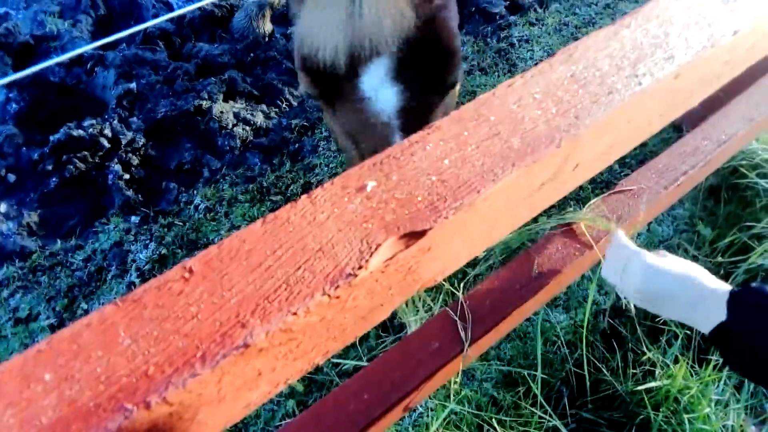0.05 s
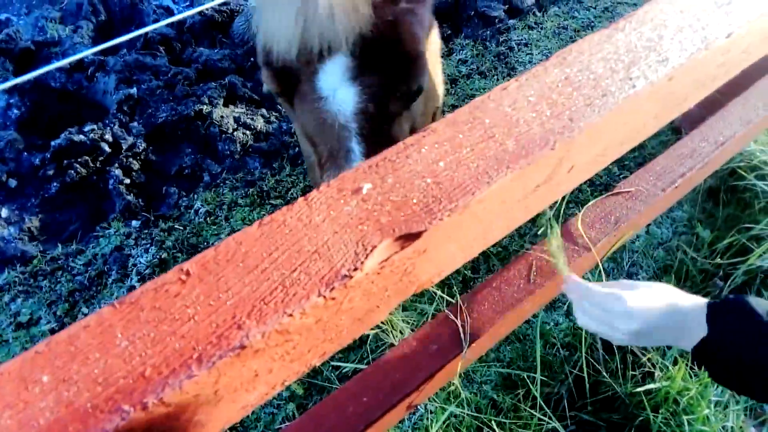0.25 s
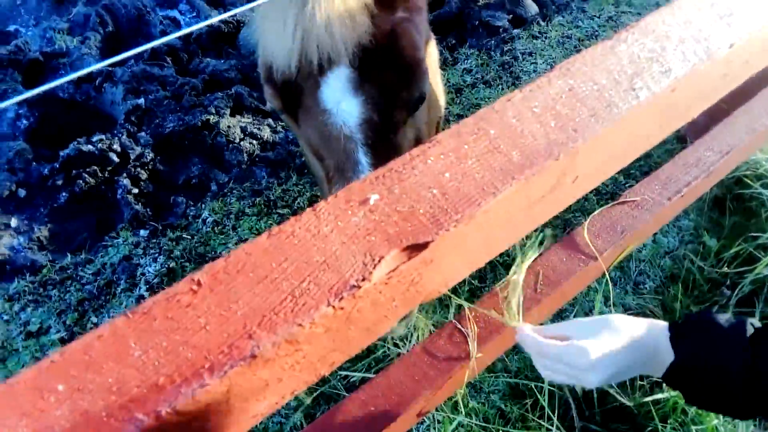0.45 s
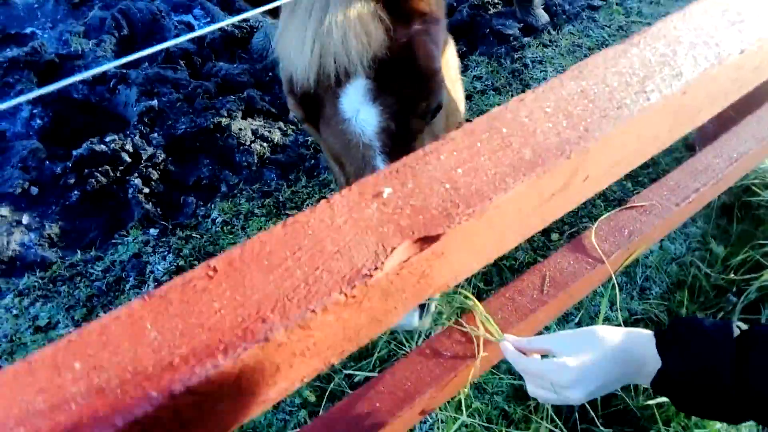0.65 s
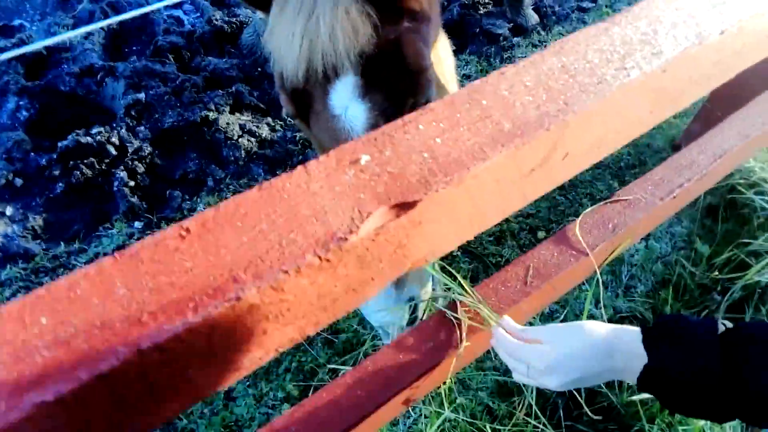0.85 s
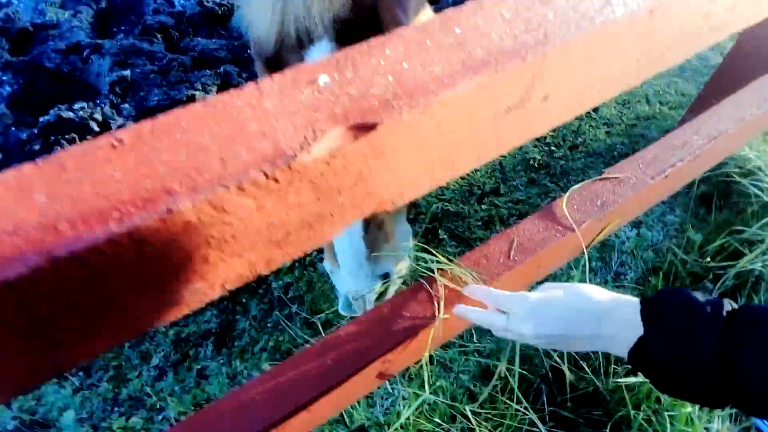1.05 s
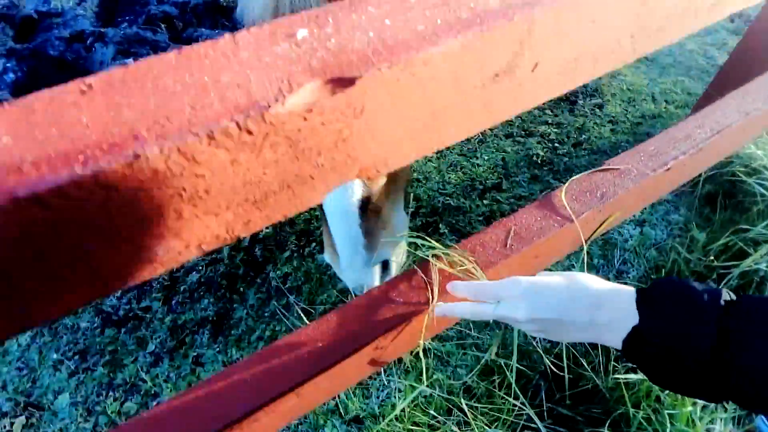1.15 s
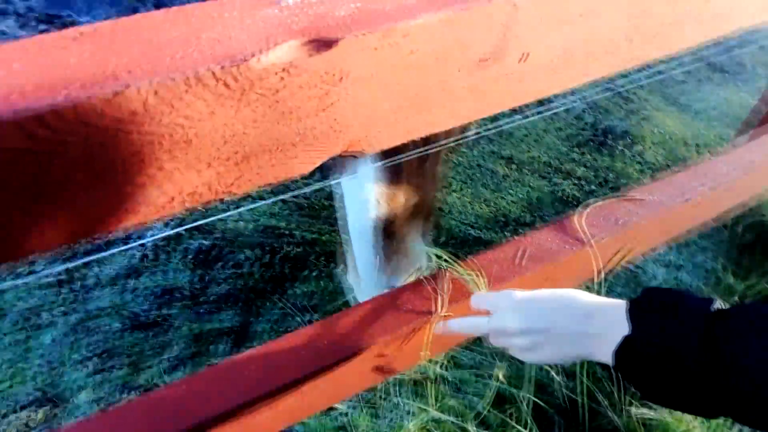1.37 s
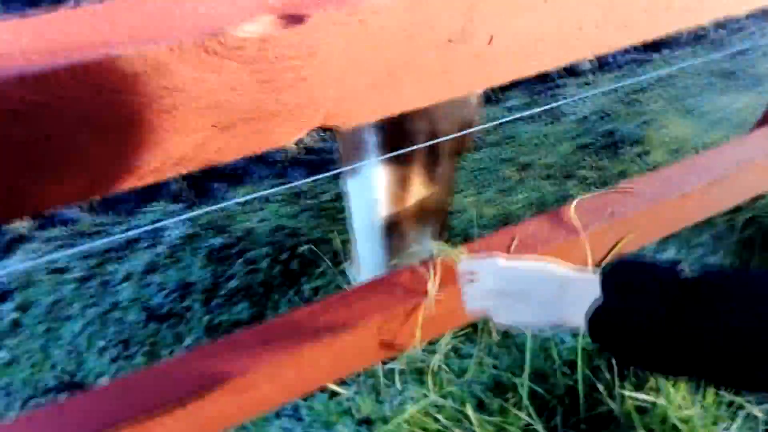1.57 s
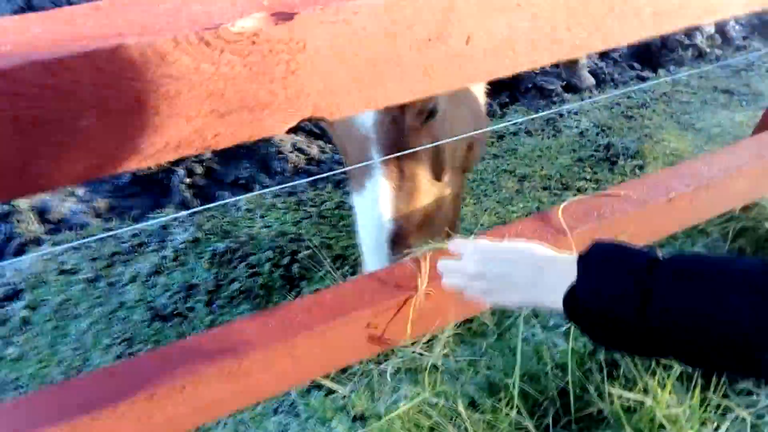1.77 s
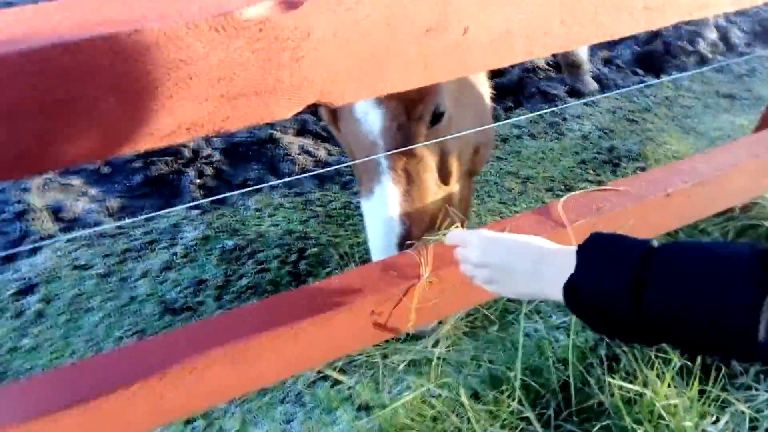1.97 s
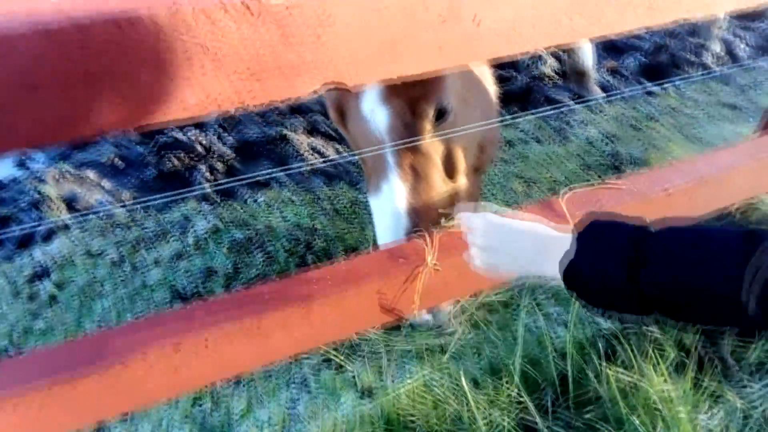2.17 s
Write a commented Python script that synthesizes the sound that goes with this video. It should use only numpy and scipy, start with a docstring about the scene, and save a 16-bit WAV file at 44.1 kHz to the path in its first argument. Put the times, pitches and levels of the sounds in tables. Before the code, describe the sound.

Close up, a horse munches grass in a quiet outdoor paddock. Low chewing thuds are joined by hissing blades, snapping stems, a dry tick and soft muzzle bumps, over a low rumble and a few faint bird calls.

```python
"""Horse chewing grass.

A horse chews close by: dull thuds, about four a second, and wet crunches in the mouth.
A tuft rustles at its muzzle as blades slide over each other, with a sinking hiss; stems snap.
Soft bumps come as it reaches the hand, and one dry tick.
Behind: a quiet paddock, low rumble, a few faint, distant bird calls."""
import sys
import numpy as np
from scipy import signal
from scipy.fft import rfft, irfft, next_fast_len
from scipy.io import wavfile
from scipy.ndimage import uniform_filter1d, map_coordinates

SR = 44100
rng = np.random.default_rng(int(sys.argv[2]) if len(sys.argv) > 2 else 0)


def persist_wave(psi):
    """Save psi, clipped to +-1, as 16-bit WAV."""
    counts = np.round(np.clip(psi, -1, 1) * 32767).astype(np.int16)
    wavfile.write(sys.argv[1], SR, np.atleast_2d(counts).T)


N = 97681

# open air (frequency [Hz], gain [dB])
AIR_COLOUR = [(20, -6), (50, -15.5), (110, 1.5), (180, 4), (280, -6), (420, -12.5), (650, -8.5),
              (1000, -12), (1500, -18.5), (2200, -20.5), (3500, -21.5), (5800, -19.5), (7000, -24.5),
              (8200, -34), (12000, -32), (15500, -26)]
# low rumble (time [s], level [dB])
RUMBLE_LEVEL = [(0, -79), (.4, -62.5), (.8, -59), (1.05, -50.5), (1.3, -54), (1.45, -51.5), (1.7, -50),
                (1.85, -54.5), (2.0, -58), (2.1, -61.5), (2.21, -56)]
# low rumble (frequency [Hz], gain [dB])
RUMBLE_COLOUR = [(20, -28), (45, -5), (75, 0), (180, -1), (300, -9), (700, -46)]
# distant calls (time [s], length [s], start pitch [Hz], end pitch [Hz], level [dB])
BIRD_CALLS = [(.22, 0.049, 1600, 1540, -65.5), (0.402, 0.092, 1630, 1520, -61),
              (0.491, 0.088, 1540, 1546, -67.5), (.52, 0.12, 1730, 1860, -71), (.26, 0.19, 5900, 5160, -74),
              (1.067, .12, 2326, 2187, -52), (2.019, .09, 2540, 2565, -57)]
# chewing thuds (time [s], level [dB], pitch [Hz], swell [s])
CHEWS = [(0.4245, -21, 182.4, 0.0058), (.665, -15.5, 182, 0.0051), (0.9385, -16.5, 183.4, .0048),
         (1.1889, -22.5, 191, 0.0047), (1.7342, -18, 179, .0046), (1.9614, -24, 182, 0.0046),
         (2.1971, -18.5, 178, .0041)]
# grinding after a thud (frequency [Hz], gain [dB])
GRIND_COLOUR = [(25, -19), (60, -16.5), (170, -3.5), (330, -6), (500, -12), (750, -9.5), (1200, -29),
                (4000, -37), (9000, -48)]
# sliding blades (time [s], level [dB])
BLADE_LEVEL = [(.6, -88), (.75, -77), (.795, -53.5), (.85, -47.5), (.89, -41.5), (.95, -42.5), (1.05, -45),
               (1.14, -42), (1.18, -46.5), (1.24, -42), (1.29, -45.5), (1.345, -41.5), (1.385, -46.5),
               (1.455, -44.5), (1.5, -57.5), (1.6, -50.5), (1.7, -52.5), (1.85, -54.5), (1.94, -46),
               (2.0, -45), (2.06, -51.5), (2.135, -48.5), (2.21, -55)]
# sliding blades (frequency [Hz], gain [dB])
BLADE_COLOUR = [(300, -60), (1000, -32), (1600, -15.5), (2400, -12.5), (3200, -7), (4300, -3), (5500, -1.5),
                (6500, -1), (7200, -7), (8200, -21), (10000, -23), (12500, -30), (15500, -25)]
# finest crackle (time [s], level offset [dB])
FIZZ_OFFSET = [(.8, 0), (.88, 0), (1.25, 3.5), (1.45, 2.5), (1.55, 1), (1.87, -15), (1.97, 0), (2.2, -6)]
# finest crackle (frequency [Hz], gain [dB])
FIZZ_COLOUR = [(5000, -30), (8000, 0.5), (10000, -3), (12500, -2.5), (14500, 1), (16000, 1.5)]
# stalk rasp, upper mids (time [s], level [dB])
RASP_LEVEL = [(.72, -82), (.8, -55.5), (.89, -52), (.98, -54.5), (1.12, -54), (1.29, -55), (1.345, -43.5),
              (1.38, -53), (1.45, -47), (1.52, -61), (1.59, -58.5), (1.67, -57.5), (1.74, -74), (1.84, -60),
              (1.92, -57.5), (1.99, -52), (2.06, -57), (2.16, -54), (2.21, -63)]
# stalk rasp (frequency [Hz], gain [dB])
RASP_COLOUR = [(400, -22.5), (900, -5), (1300, 0.5), (2300, 1.5), (3200, -1), (5000, -18), (9000, -33)]
# tuft scrape, low mids (time [s], level [dB])
SCRAPE_LEVEL = [(.6, -94), (.74, -70), (.82, -54), (.89, -46.5), (.98, -53), (1.12, -52.5), (1.31, -55.5),
                (1.37, -53.5), (1.43, -50), (1.53, -53), (1.62, -57.5), (1.7, -61), (1.8, -55.5),
                (1.92, -55), (1.99, -48.5), (2.07, -52), (2.21, -61.5)]
# tuft scrape (frequency [Hz], gain [dB])
SCRAPE_COLOUR = [(100, -14.5), (200, 5), (400, 1), (700, 0.5), (1000, -1), (1400, -8.5), (2500, -18.5),
                 (8000, -57)]
# wet crunches (time [s], level [dB], T60 [s])
CRUNCHES = [(.704, -49.5, 0.031), (0.895, -36, .025), (1.2217, -34, 0.02), (1.545, -51, 0.021),
            (1.637, -47, 0.064), (1.9436, -29.5, 0.027), (1.955, -34, 0.036), (2.0089, -33, 0.039)]
# mouth cavity (frequency [Hz], gain [dB])
MOUTH_COLOUR = [(80, -17), (200, 3.5), (390, 4), (520, -6), (750, -6), (1050, -7.5), (1450, -6),
                (1900, -22), (5000, -16), (12000, -39)]
# narrow hiss in the rustle (time [s], centre [Hz], level [dB])
SQUEAK_GLIDE = [(0.839, 6410, -71), (0.909, 6310, -45), (1.001, 5950, -45), (1.058, 5610, -50.5),
                (1.139, 5250, -57), (1.2, 5100, -70)]
# snapping stems (time [s], level [dB], T60 [s], stem pitch [Hz])
SNAPS = [(1.3055, -42, 0.016, 6500), (1.321, -31.5, 0.024, 4840), (1.3243, -30, 0.013, 1274),
         (1.3366, -24.5, .012, 2450), (1.3465, -28.5, .011, 4030), (1.3606, -26.5, 0.015, 3720),
         (1.3618, -25.5, 0.011, 5110), (1.4634, -33, 0.0054, 4120), (1.56, -36, 0.0068, 6200),
         (1.599, -32.5, 0.0033, 5220), (1.5982, -37, 0.0052, 3460), (1.874, -36.5, 0.0077, 3840),
         (1.884, -39.5, 0.025, 3900), (2.0092, -29, 0.016, 3490), (2.012, -25, 0.0045, 6320)]
# stem crack (frequency [Hz], gain [dB])
SNAP_COLOUR = [(200, -19.5), (700, 1), (1300, 0), (2600, -2.5), (4500, -2), (6500, 1), (8200, -10.5),
               (12000, -19), (15500, -15)]
# muzzle at the hand (time [s], level [dB], pitch [Hz], swell [s])
BUMPS = [(1.391, -40.5, 90, 0.0073), (1.418, -36.5, 94, 0.0076), (1.486, -34.5, 83.6, 0.0082),
         (1.5812, -23, 105, 0.0045), (1.5945, -23.5, 78, .0095), (1.672, -34.5, 104, 0.0073)]
# dry tick (frequency [Hz], gain [dB])
TICK_COLOUR = [(500, -24), (2000, -8), (3300, 1), (5000, 5), (6500, 4), (8500, -9.5), (15000, -17)]


def amp(db):
    """Decibels to gain."""
    return 10 ** (np.asarray(db) / 20)


def unit(x):
    """Scale to rms 1."""
    return x / np.sqrt(np.mean(x ** 2) + 1e-20)


def curve(rows):
    """Interpolate (time [s], value) rows per sample."""
    return np.interp(np.arange(N) / SR, *np.transpose(rows))


def wobble(rate_hz):
    """Smooth random curve, rate_hz knots a second."""
    knots = rng.standard_normal(int(N * rate_hz / SR) + 4)
    return map_coordinates(knots, [np.arange(N) * rate_hz / SR])


def add(track, at_s, sound):
    """Mix a sound into a track."""
    part = track[max(round(at_s * SR), 0):][:len(sound)]
    part += sound[:len(part)]


def response(colour, size=4096):
    """Minimum-phase impulse response of a colour, energy 1."""
    hz, db = np.transpose(colour)
    bin_db = np.interp(np.log(np.fft.rfftfreq(size, 1 / SR) + 1), np.log(hz), db)
    cepstrum = irfft(np.log(amp(bin_db)))
    cepstrum[1:size // 2] *= 2
    cepstrum[size // 2 + 1:] = 0
    impulse = irfft(np.exp(rfft(cepstrum)))
    return impulse / np.linalg.norm(impulse)


def coloured(x, colour):
    """Filter by a (frequency [Hz], gain [dB]) table."""
    return signal.fftconvolve(x, response(colour))[:N]


def paddock(air_db=-59.5, waver_db=0.83):
    """Steady open air and an uneven low rumble."""
    air = amp(air_db) * unit(coloured(rng.standard_normal(N), AIR_COLOUR))
    rumble_db = curve(RUMBLE_LEVEL) + waver_db * wobble(25.74)
    return air + amp(rumble_db) * unit(coloured(rng.standard_normal(N), RUMBLE_COLOUR))


def birds(blur_rad_per_hz=0.6 / 1600):
    """Faint gliding calls; distance blurs the higher ones more."""
    out = np.zeros(N)
    for at_s, length_s, start_hz, end_hz, db in BIRD_CALLS:
        progress = np.linspace(0, 1, int(length_s * SR))
        phase = 2 * np.pi * np.cumsum(start_hz + (end_hz - start_hz) * progress) / SR
        phase += blur_rad_per_hz * start_hz * wobble(150)[:len(progress)]
        add(out, at_s, amp(db) * np.sqrt(2) * np.sin(np.pi * progress) * np.sin(phase))
    return out


def thuds(rows, steepness=2.11, bend=0.2, settle_s=0.0025):
    """Soft blows swell and die within a few cycles; the pitch starts high and settles."""
    out, t = np.zeros(N), np.arange(SR // 10) / SR
    for at_s, db, hz, swell_s in rows:
        cycles = hz * (t + bend * settle_s * (1 - np.exp(-t / settle_s)))
        envelope = (t / swell_s * np.exp(1 - t / swell_s)) ** steepness
        add(out, at_s, amp(db) * envelope * np.sin(2 * np.pi * cycles))
    return out


def bursts(rows, colour, attack_s=0.00038):
    """Decaying noise bursts through a body."""
    out, t = np.zeros(N), np.arange(SR // 3) / SR
    for at_s, db, t60_s in rows:
        envelope = amp(db - 60 * t / t60_s) * (1 - np.exp(-t / attack_s))
        add(out, at_s, envelope * rng.standard_normal(len(t)))
    return coloured(out, colour)


def chewing(grind_db=-32, grind_t60_s=0.32):
    """Each chew: a dull thud, then rough, low grinding."""
    grinds = [(at_s, db + grind_db, grind_t60_s) for at_s, db, _, _ in CHEWS]
    return thuds(CHEWS) + bursts(grinds, GRIND_COLOUR)


def friction(colour, rate_hz, spread_db, hiss, shift_db):
    """Tiny uneven clicks over hiss, rms 1; the colour shifts as different blades touch."""
    clicks = (rng.random(N) < rate_hz / SR) * rng.choice([-1, 1], N)
    sizes = amp(spread_db * np.minimum(rng.exponential(size=N), 4))
    grains = unit(unit(clicks * sizes) + hiss * rng.standard_normal(N))
    spectra = signal.stft(coloured(grains, colour), nperseg=512)[2]
    patches = uniform_filter1d(rng.standard_normal(spectra.shape), 6, axis=0)
    patches = unit(uniform_filter1d(patches, 8, axis=1))
    return unit(signal.istft(spectra * amp(shift_db * patches), nperseg=512)[1][:N])


def grass(flutter_db=0.74, pressed_db=-44.5, fizz_base_db=-54.5, fizz_slope=1.67):
    """Sliding blades crackle and, pressed hard, fizz; stalks rasp; the tuft scrapes."""
    flutter = amp(flutter_db * wobble(70))
    blades = friction(BLADE_COLOUR, rate_hz=2500, spread_db=2, hiss=0.83, shift_db=2)
    fizz = friction(FIZZ_COLOUR, rate_hz=1800, spread_db=-0.5, hiss=0.87, shift_db=2.2)
    rasp = friction(RASP_COLOUR, rate_hz=900, spread_db=1, hiss=0.93, shift_db=1.5)
    scrape = friction(SCRAPE_COLOUR, rate_hz=700, spread_db=2, hiss=1, shift_db=2.5)
    blade_db = curve(BLADE_LEVEL)
    fizz_db = fizz_base_db + curve(FIZZ_OFFSET) + fizz_slope * (blade_db - pressed_db)
    treble = amp(blade_db) * blades + amp(fizz_db) * fizz
    mids = amp(curve(RASP_LEVEL)) * rasp + amp(curve(SCRAPE_LEVEL)) * scrape
    return flutter * (treble + mids)


def crunches(pop_db=-5.5, pop_t60_s=0.04, start_hz=965, end_hz=373, fall_s=0.0023):
    """Grass crushed in the mouth: a muffled burst and a detuned wet pop, falling as a pocket opens."""
    pops, t = np.zeros(N), np.arange(SR // 20) / SR
    cycles = end_hz * t + (start_hz - end_hz) * fall_s * (1 - np.exp(-t / fall_s))
    for at_s, db, _ in CRUNCHES:
        detune = rng.uniform(0.856, 1.26)
        add(pops, at_s, amp(db + pop_db - 60 * t / pop_t60_s) * np.sin(2 * np.pi * cycles * detune))
    return pops + bursts(CRUNCHES, MOUTH_COLOUR)


def squeak(width_hz=900):
    """A narrow band of hiss gliding down."""
    times_s, centre_hz, db = np.transpose(SQUEAK_GLIDE)
    phase = 2 * np.pi * np.cumsum(curve(np.c_[times_s, centre_hz])) / SR
    band = unit(wobble(width_hz) * np.cos(phase) + wobble(width_hz) * np.sin(phase))
    return band * amp(np.interp(np.arange(N) / SR, times_s, db, left=-np.inf, right=-np.inf))


def snaps(crack_db=5, ring_db=-4, ring_t60_s=0.025, tear_db=-16.5, tear_t60_s=0.059, hard_above_db=-34):
    """Stems crack and ring; fibres tear on after hard breaks, light ones sound like the blades."""
    rings, impulses, t = np.zeros(N), np.zeros(N), np.arange(SR // 20) / SR
    for at_s, db, _, hz in SNAPS:
        phase = 2 * np.pi * hz * t + 0.67 * wobble(690)[:len(t)]
        add(rings, at_s, amp(db + ring_db - 60 * t / ring_t60_s) * np.sin(phase))
        add(impulses, at_s, amp([db + crack_db]))
    cracks = coloured(impulses, SNAP_COLOUR)
    hard = [(at_s, db, t60_s) for at_s, db, t60_s, _ in SNAPS if db > hard_above_db]
    light = [(at_s, db, t60_s) for at_s, db, t60_s, _ in SNAPS if db <= hard_above_db]
    tears = [(at_s, db + tear_db, tear_t60_s) for at_s, db, _ in hard]
    return rings + cracks + bursts(hard + tears, SNAP_COLOUR) + bursts(light, BLADE_COLOUR)


def bumps():
    """Soft, low blows as the muzzle reaches the hand."""
    return thuds(BUMPS)


def tick(at_s=1.5038, peak_db=-17.5):
    """One dry, sharp click."""
    out, click = np.zeros(N), response(TICK_COLOUR)
    add(out, at_s, amp(peak_db) * click / np.abs(click).max())
    return out


def scene():
    """Horse and grass in front, paddock behind; mono."""
    mouth = chewing() + bumps() + crunches()
    return (mouth + snaps() + tick() + grass() + squeak() + paddock() + birds())[None]


def record(dry):
    """Brick-wall low-pass."""
    cutoff_hz = 16000
    size = next_fast_len(N + SR // 2)
    passband = np.fft.rfftfreq(size, 1 / SR) < cutoff_hz
    return irfft(rfft(dry, size) * passband, size)[:, :N]


dry = scene()
out = record(dry)
persist_wave(out)
```